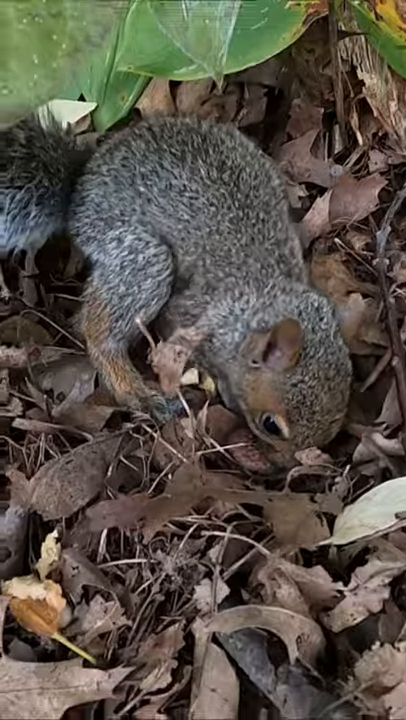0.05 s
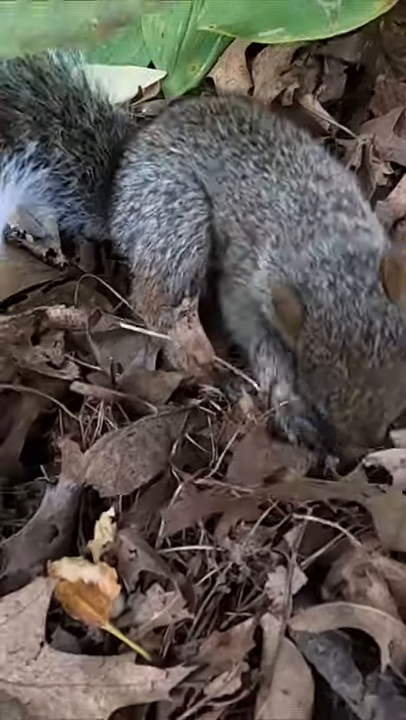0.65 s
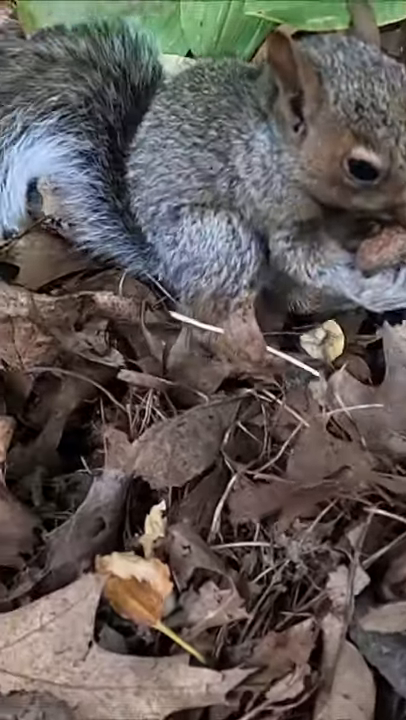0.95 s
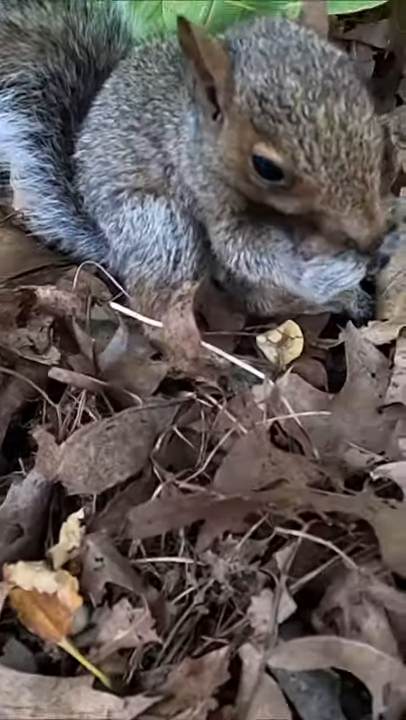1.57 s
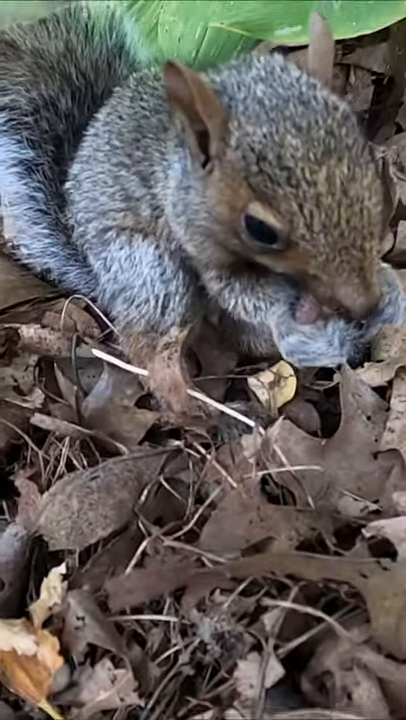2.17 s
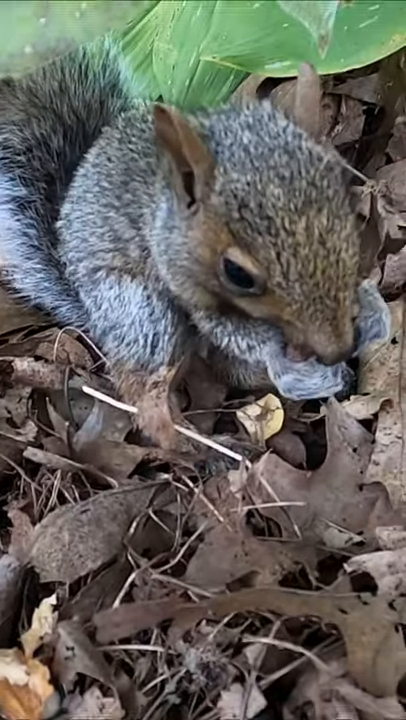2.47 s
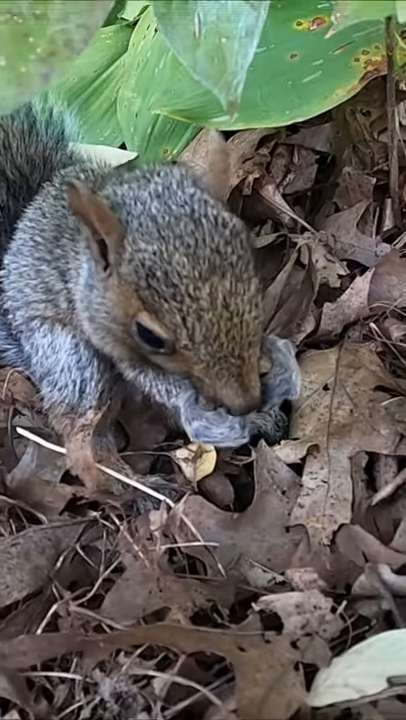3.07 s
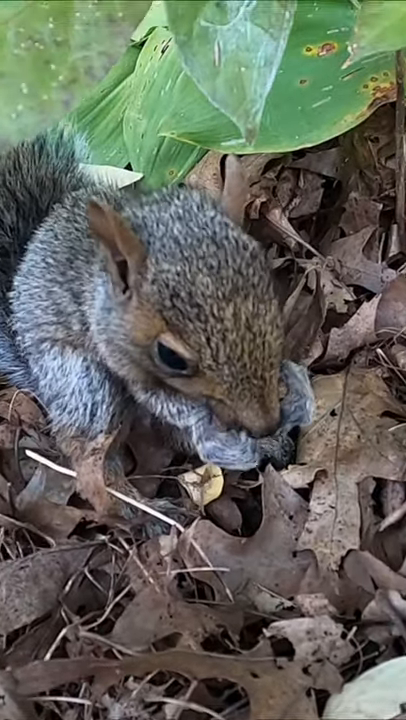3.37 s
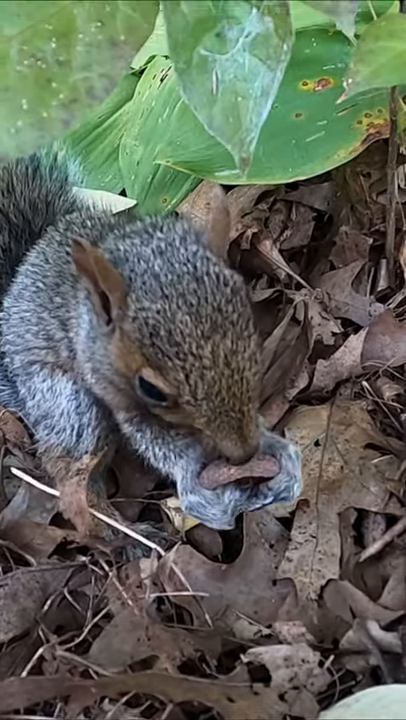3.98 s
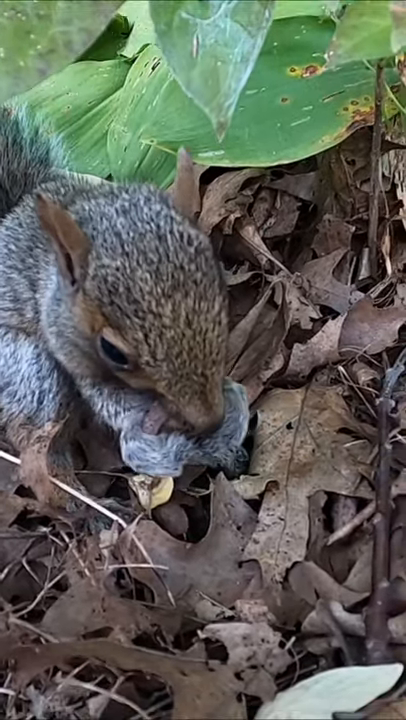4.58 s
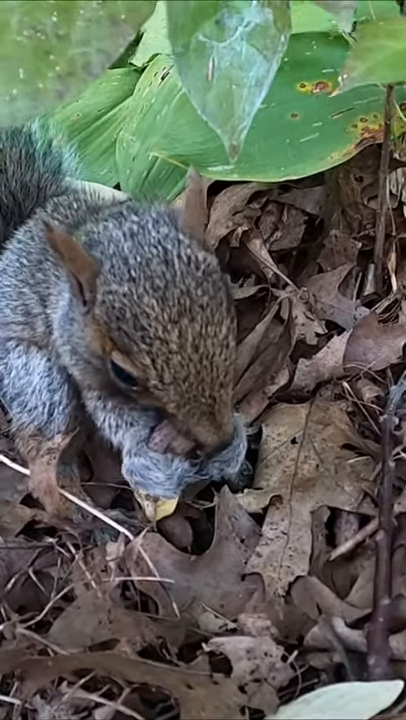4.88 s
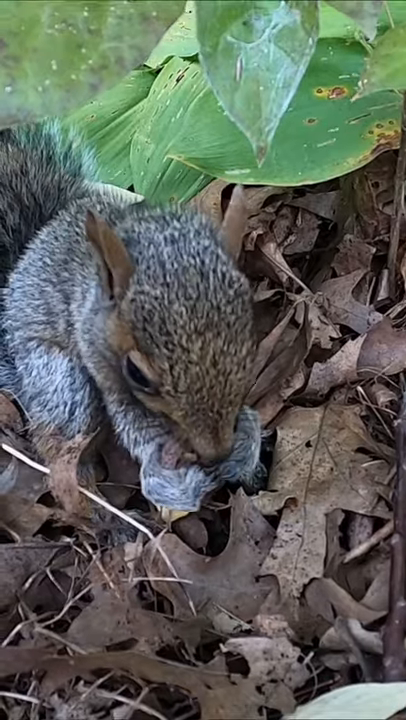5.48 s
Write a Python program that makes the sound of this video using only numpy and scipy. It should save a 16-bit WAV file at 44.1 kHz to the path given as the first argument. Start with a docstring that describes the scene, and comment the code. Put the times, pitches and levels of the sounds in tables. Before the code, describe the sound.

A low wind rumble with a faint hiss runs throughout, outdoors. From the start until about 1.2 seconds, a squirrel close to the microphone shoves through dry leaves in quick, crisp rustles, with small snaps of stalks and a few light twig taps. After a brief lull, a dull handling bump comes at about 1.8 seconds, with softer ones near 2.2 and 2.6. From around 2 seconds the squirrel gnaws a nut: short gritty tooth scrapes and dry, sharp cracks at uneven intervals, over light leaf crackle. A strong crack lands at 2.9 seconds, with more between 3.2 and 3.7. The gnawing pauses around 4 seconds, then clicks again near 4.5. Two very faint, high squeaks occur at about 3 and 4.7 seconds. From 5 seconds to the end at 5.5 comes a busier run of loud shell snaps.

```python
"""Outdoors, on ground covered in dry leaves, a young squirrel noses about close to a hand-held camera,
then sits and gnaws a nut. Leaves crackle under its paws as countless tiny flakes break. Its teeth scrape
the shell and crack it in single sharp snaps. The nut rings, twigs tap, the hand bumps the camera,
and there are two faint squeaks. A low wind rumble with a faint hiss lies under it all."""
import sys
import numpy as np
from scipy import signal
from scipy.fft import rfft, irfft
from scipy.io import wavfile
from scipy.ndimage import uniform_filter1d

SR = 44100
rng = np.random.default_rng(int(sys.argv[2]) if len(sys.argv) > 2 else 0)


def store_wav(level_fs):
    """Save 16-bit WAV to argv[1]."""
    pcm = np.round(np.clip(np.atleast_2d(level_fs), -1, 1) * 32767)
    wavfile.write(sys.argv[1], SR, pcm.T.astype(np.int16))


N = 244314
TIME = np.arange(N) / SR
FREQS = np.fft.rfftfreq(N, 1 / SR)

# how strongly the wind rumbles: (time [s], level [dB])
GUSTS = [(0, -30.5), (0.45, -35), (1.4, -34.5), (1.9, -34), (2.9, -34), (3.6, -35), (4.5, -33.5),
         (5.54, -34.5)]
# tone of the rumble: (frequency [Hz], relative level [dB])
RUMBLE_TONE = [(4, -24), (15, -11), (30, -5), (60, -0.5), (100, 0), (160, -8), (230, -13.5), (320, -20.5),
               (450, -31.5), (650, -44), (1000, -77.5)]
# how alike the rumble is at the two microphones: (frequency [Hz], likeness [0-1])
RUMBLE_LIKENESS = [(25, .975), (90, .989), (220, .973), (500, .88), (1000, .7)]
# swirls of air hitting the microphones: (peak time [s], half-length [s], level [dB])
SWIRLS = [(0.126, 0.067, -55), (2.347, 0.1, -45), (4.556, 0.082, -32), (5.283, 0.45, -41.5)]
# tone of the far hiss: (frequency [Hz], relative level [dB])
HISS_TONE = [(300, 0.5), (600, 2.5), (850, -3), (1200, 2.5), (2000, -4.5), (4000, -7), (6500, -10),
             (8500, -19), (10500, -30), (13000, -47), (15000, -65)]
# how alike the hiss is at the two microphones: (frequency [Hz], likeness [0-1])
HISS_LIKENESS = [(400, .6), (1200, .5), (3000, .25), (6000, .05), (12000, 0)]
# the hiss comes from the left: (frequency [Hz], left minus right [dB])
HISS_SIDE = [(400, 6), (1200, 5.5), (3000, 13), (7000, 3.5), (12000, 11)]
# the hand bumps the camera:
# (time [s], thud level [dB], ring level [dB], ring pitch [Hz], ring fade by 60 dB [s], sharpness [Q])
HAND_BUMPS = [(1.844, -20.5, -28.5, 790, 0.026, 4.6), (2.171, -30.5, -53, 744, 0.077, 5),
              (2.618, -29.5, -35, 718, 0.088, 11)]
# dull rubs on the ground: (time [s], pitch [Hz], level [dB], fade by 60 dB [s])
GROUND_RUBS = [(0.135, 780, -43.5, 0.081), (0.743, 900, -44, 0.17), (0.8904, 474, -29, 0.013),
               (2.255, 730, -47, 0.27)]
# twigs tapping: (time [s], pitch [Hz], level [dB])
TWIG_TAPS = [(1.008, 1490, -45), (1.104, 1550, -54), (1.151, 1330, -45), (1.19, 1360, -40),
             (1.86, 1180, -37), (1.891, 1310, -47.5), (2.613, 1500, -52), (3.623, 1140, -38.5),
             (4.248, 1240, -41)]
# the hollow nut and curled leaves ring when bitten or bent:
# (time [s], pitch [Hz], level [dB], fade by 60 dB [s])
NUT_RINGS = [(0.18, 6050, -43.5, 0.053), (0.345, 4000, -39.5, 0.04), (0.603, 3050, -44.5, 0.13),
             (0.868, 2450, -41, 0.078), (1.613, 3000, -49, 0.12), (1.793, 3080, -34, 0.036),
             (1.841, 1710, -32, 0.033), (1.845, 3170, -41, 0.05), (2.617, 3130, -43.5, 0.04),
             (3.2093, 11300, -44, 0.005), (3.601, 11800, -45, 0.0069), (3.784, 3400, -47.5, 0.13),
             (4.338, 2850, -39.5, 0.041), (4.484, 2390, -43, 0.047), (4.513, 3150, -38, 0.013),
             (4.684, 2060, -40.5, 0.046)]
# the tones in the squeaks: (time [s], fade time [s], pitch [Hz], sharpness [Q], level [dB])
SQUEAK_TONES = [(3.015, 0.11, 3050, 8, -63), (3.035, 0.075, 7400, 30, -72), (3.035, 0.075, 8300, 30, -74),
                (4.728, 0.24, 4620, 45, -69.5), (4.728, 0.09, 5300, 14, -66.5),
                (4.728, 0.14, 7400, 35, -71.5), (4.728, 0.08, 7750, 35, -70), (4.728, 0.12, 9830, 35, -80)]
# hiss opening the second squeak: (time [s], fade time [s], level [dB], pitch [Hz], sharpness [Q])
SQUEAK_PUFF = (4.725, 0.045, -66, 10200, 1.8)
# tone of dry leaves: (frequency [Hz], relative level [dB])
LEAF_TONE = [(400, 5.5), (800, -3), (1200, 0.5), (2600, 0), (4000, -3), (5000, -3), (7500, -1.5),
             (10000, -11), (12500, -14), (16000, -30)]
# how much the squirrel stirs between shoves: (time [s], level [dB])
FIDGETING = [(0, -64), (1.25, -60), (1.45, -72.5), (1.8, -64), (2.8, -65), (3.15, -72.5), (3.55, -63.5),
             (3.95, -69.5), (4.4, -67), (5.54, -67)]
# nose and paws push into the leaves: (start [s], length [s], level [dB], fizz relative to level [dB])
SHOVES = [(0.106, 0.1, -58.5, -6), (0.215, 0.061, -58.5, -7), (0.286, 0.098, -52, -7),
          (0.404, 0.15, -57.5, -8), (0.582, 0.054, -55.5, -8.5), (0.646, 0.13, -55.5, -9),
          (0.749, 0.054, -64, 0), (0.834, 0.095, -49.5, -7), (0.935, 0.12, -62, -4),
          (1.123, 0.16, -67, -39), (1.689, 0.2, -56.5, -10.5), (1.902, 0.16, -60, -11.5),
          (2.24, 0.17, -62, -22), (2.561, 0.066, -63, -42), (2.855, 0.078, -56, -5.5),
          (2.918, 0.036, -51, -9), (2.996, 0.086, -65.5, -3), (3.776, 0.069, -61.5, -10),
          (5.184, 0.1, -68, -2.5), (5.37, 0.14, -64, -5)]
# teeth and claws scrape: (middle [s], half-length [s], level [dB], fizz relative to level [dB])
SCRAPES = [(1.08, 0.017, -51, -10), (1.106, 0.013, -48, -9), (1.227, 0.0098, -50.5, -7.5),
           (1.955, 0.028, -47.5, -8.5), (2.049, 0.0098, -53, -10.5), (2.169, 0.032, -53.5, -13),
           (2.351, 0.037, -51.5, -15), (2.527, 0.035, -52, -19), (2.618, 0.0093, -49.5, -15),
           (2.682, 0.0054, -49.5, -19), (2.713, 0.02, -49.5, -14), (2.802, 0.014, -56, -25),
           (3.424, 0.0052, -43, -15), (3.699, 0.018, -50, -7.5), (4.324, 0.026, -55.5, -9),
           (4.341, 0.014, -54.5, -9.5), (4.481, 0.018, -56.5, -8), (4.515, 0.014, -54, -3),
           (4.693, 0.025, -54, -3.5), (4.977, 0.0043, -50, -10), (5.069, 0.013, -59, 3),
           (5.195, 0.013, -50.5, -3), (5.349, 0.009, -54.5, -9)]
# trodden leaves are crisper than the gnawed nut: (time [s], change in the highest treble [dB])
CRISPNESS = [(0, 3.5), (0.9, 4), (1.2, 4.5), (1.45, 0), (2.6, -3), (3.05, -4), (3.3, -3), (3.75, 2.5),
             (4.3, -22), (5.2, -8), (5.5, -9)]
# shell and leaf stalks snap: (time [s], low ring [dB], main ring [dB], main pitch [Hz],
# main sharpness [Q], bright edge [dB], edge pitch [Hz])
SNAPS = [(0.2358, -40, -28, 3020, 1, -18.5, 7500), (0.2851, -26, -18, 2200, 1.6, -33, 6000),
         (0.3077, -19, -16, 3730, 0.76, -25, 9500), (0.347, -16, -23, 2340, 1.6, -11, 3900),
         (0.3862, -28, -29.0, 3900, 0.7, -8.5, 6340), (0.4344, -40, -30, 3200, 1, -20, 6500),
         (0.449, -30, -20, 2800, 2.2, -30, 6500), (0.469, -17, -11.5, 3470, 1.4, -21, 7600),
         (0.4939, -38, -28, 3200, 1, -26, 7000), (0.528, -22, -20, 2740, 2.6, -20, 7300),
         (0.733, -26, -16.5, 3020, 1, -36, 6500), (0.789, -35, -24, 2750, 1, -25, 7500),
         (0.8629, -37, -3.5, 2350, 1.4, -11, 6500), (0.8770, -18, -12, 2520, 1.3, -23, 5500),
         (0.889, -6, -4.5, 2440, 2.6, -8, 6400), (0.8896, -13, -33.0, 2830, 1.5, -19, 10000),
         (0.912, -23, -13, 2300, 1.2, -30, 9800), (0.9282, -45, -13, 2630, 1.4, -12, 4100),
         (0.9670, -28, -18, 2750, 1.2, -23, 6500), (1.0568, -50, -23, 3360, 1.4, -14, 6800),
         (1.149, -27, -30, 2260, 0.8, -22.5, 8500), (1.1941, -5, -22, 3100, 1.4, -23, 9300),
         (1.8195, -26, -16, 3100, 2.2, -35, 6000), (1.8418, -16, -1, 1680, 1.34, -36, 6000),
         (1.8618, -3, -36, 2950, 1.6, -50, 6300), (2.1643, -29, -10, 2460, 1.9, -28, 6500),
         (2.184, -28, -18, 2600, 1.5, -31, 6500), (2.341, -24, -21, 2500, 1, -20, 6000),
         (2.354, -15, -8, 2360, 2, -18, 6300), (2.525, -6.5, -9.0, 2390, 0.71, -12, 5900),
         (2.5407, -22, -14.5, 2900, 1, -26, 6500), (2.6843, -10, -12, 2580, 1.3, -26, 6700),
         (2.705, -8, -7.0, 2920, 0.67, -18, 6700), (2.77, -39, -14, 2740, 2.3, -24, 4000),
         (2.8609, -10, -23, 2900, 0.65, -32, 6900), (2.9059, 0.5, 10.5, 2520, 1.19, -1, 3980),
         (2.9524, -30, -18, 2970, 1, -21, 5770), (3.2092, -6, -5, 2380, 1.4, -6.5, 6600),
         (3.2196, -11, 2.5, 2940, 0.82, -13, 6940), (3.3349, -20, -22.0, 1700, 0.7, -22, 5900),
         (3.3582, -50, -40.5, 3900, 0.7, -24, 7400), (3.4201, -8, -6.5, 2840, 0.96, -9, 5700),
         (3.44, -52, -25, 3900, 0.57, -33, 10000), (3.593, -50, -16, 2790, 1.4, -34, 8900),
         (3.6011, 3.5, -3.5, 2250, 1.36, -10.5, 5300), (3.6845, -13, -12, 2830, 1.2, -21, 5400),
         (3.6899, -20, -12, 2900, 1, -28, 6200), (3.7001, -4, -3, 2180, 2.5, -12.5, 6440),
         (3.7206, -50, -40, 3000, 1, -23, 9000), (3.8053, -45, -17, 3370, 1.4, -26, 5900),
         (3.838, -36, -16.5, 3560, 1.1, -15.5, 8550), (4.0342, -50, -43, 3040, 1.8, -25, 9700),
         (4.4603, -50, -45.5, 3900, 0.8, -24, 10000), (4.4747, -24, -21, 2740, 0.8, -23, 6100),
         (4.4902, -27, -23, 2600, 1.2, -32, 6500), (4.516, -13, -5, 3060, 3.6, -25, 6500),
         (4.544, -14, -2.5, 3020, 2.1, -19, 7800), (4.5529, -15, -15, 3090, 2.9, -23, 5500),
         (4.6554, -28, -25.5, 3870, 0.48, -37, 10000), (4.9906, -16, -14, 2410, 0.73, -19, 6900),
         (5.0084, -22, 1, 2820, 1.08, -3, 7100), (5.073, -10.5, -10.5, 2770, 1.1, -23, 7600),
         (5.1746, -7, -0.5, 2870, 0.85, -31, 9200), (5.192, 8.5, 7, 2320, 1.53, -10, 6730),
         (5.352, -13, -12, 2320, 1.9, -17, 5900), (5.3927, -10, -4.5, 2600, 1.3, -21, 6600),
         (5.4234, -3, 9.5, 2730, 1.6, -8.5, 6840), (5.461, -30, -20, 3160, 1.3, -33, 7100),
         (5.4687, -32, -0.5, 2610, 1.3, -16, 6700), (5.4997, 5.5, 4, 3060, 1.4, -5.5, 6200),
         (5.512, -50, -31.0, 3050, 1.5, -29, 6600)]
# how the shell and the paws around it colour a snap: (frequency [Hz], gain [dB])
SHELL_TONE = [(100, -32), (300, -14), (560, 1), (750, -3.5), (950, -0.5), (1300, -1.5), (1800, 0),
              (2500, 1.5), (3200, -0.5), (3900, 0.5), (4800, -1.5), (6000, -1), (7400, -1.5), (8800, -5),
              (10300, -10), (11800, -13), (14000, -18), (16000, -26)]
# how far the squirrel's sound trails at the left microphone: (frequency [Hz], base phase lag [radians])
LEFT_LAG = [(0, 0), (500, .08), (1500, .27), (2800, .52), (4200, 1.05), (6000, 1.2), (9000, 1.15),
            (16000, 1.1)]
# the head turns right as the squirrel sits up: (time [s], share of the full turn [0-1])
HEAD_TURN = [(0, 0), (.9, .1), (1.3, 1), (4.5, 1), (5.54, .6)]
# the right microphone hears more treble: (frequency [Hz], left minus right [dB])
MIC_BALANCE = [(100, .9), (500, 1), (2000, .2), (4000, -.7), (8000, -2.3), (12000, -5)]


def amp(db):
    """Turns decibels into a number to multiply by."""
    return 10 ** (np.asarray(db) / 20)


def unit(x):
    """Scales a signal to an average (rms) size of 1."""
    return x / np.sqrt(np.mean(x ** 2) + 1e-20)


def at_pitch(table, hz):
    """Looks up a table by frequency, on a log scale."""
    f, value = np.transpose(table)
    return np.interp(np.log(hz + 1), np.log(f + 1), value)


def over_time(table):
    """Joins a table's points with straight lines through the scene."""
    return np.interp(TIME, *np.transpose(table))


def colour(x, gain):
    """Turns each frequency up or down by its own gain."""
    return irfft(rfft(x) * gain, N)


def add(mix, s, sound):
    """Mixes a sound in at s seconds."""
    part = mix[..., max(round(s * SR), 0):][..., :sound.shape[-1]]
    part += sound[..., :part.shape[-1]]


def hump(f, hz, q):
    """Gains that favour pitches near hz; a higher q is narrower."""
    return 1 / (1 + (q * (f / hz - hz / f)) ** 2)


def above(hz):
    """Gains that keep what lies above hz."""
    return 1 / (1 + (hz / (FREQS + 1)) ** 8)


def placed(x, sides):
    """Leans a stereo sound left or right, pitch by pitch."""
    side_db = at_pitch(sides, FREQS)
    return colour(x, amp([side_db / 2, -side_db / 2]))


def noise_pair(likeness):
    """Left and right white noise, partly alike."""
    a, b = rng.standard_normal((2, N))
    same = np.clip(at_pitch(likeness, FREQS), 0, 1)
    return np.array([a, colour(a, same) + colour(b, np.sqrt(1 - same ** 2))])


def noisy_ring(hz, q, swell):
    """Noise around one pitch, with the shape and energy of the swell."""
    f = np.fft.rfftfreq(len(swell), 1 / SR) + 1
    ring = irfft(rfft(rng.standard_normal(len(swell))) * hump(f, hz, q), len(swell))
    return unit(ring * swell) * np.sqrt(np.mean(swell ** 2))


def wind(swirl_hz=42, hiss_db=-60.5):
    """Gusts rumble, deep swirls of air hit each microphone, and a far hiss stays steady."""
    rumble = unit(colour(noise_pair(RUMBLE_LIKENESS), amp(at_pitch(RUMBLE_TONE, FREQS))))
    swirls = unit(colour(rng.standard_normal((2, N)), hump(FREQS + 1, swirl_hz, q=1)))
    swirl_gain = sum(amp(db) * np.exp(-((TIME - s) / half) ** 2) for s, half, db in SWIRLS)
    hiss = colour(noise_pair(HISS_LIKENESS), amp(at_pitch(HISS_TONE, FREQS)))
    hiss = unit(placed(hiss, HISS_SIDE))
    return rumble * amp(over_time(GUSTS)) + swirls * swirl_gain + hiss * amp(hiss_db)


def thud(db, side_db, hz=163.7, rise_s=0.0028, fade_s=0.17):
    """The whole camera rocks briefly in the hand."""
    t = np.arange(SR // 4) / SR
    swell = (1 - np.exp(-t / rise_s)) * amp(-60 * t / fade_s)
    return amp([[db + side_db / 2], [db - side_db / 2]]) * np.sin(2 * np.pi * hz * t) * swell


def knock(db, hz, fade_s, q, side_db, rise_share=0.073):
    """A short rough ring, on the left if side_db is positive; longer ones start more softly."""
    t = np.arange(SR // 4) / SR
    swell = (1 - np.exp(-t / (rise_share * fade_s))) * amp(-60 * t / fade_s)
    return amp([[db + side_db / 2], [db - side_db / 2]]) * noisy_ring(hz, q, swell)


def knocks():
    """Nut, twigs, ground and camera each ring in their own way, from their own side."""
    out = np.zeros((2, N))
    for s, hz, db, fade_s in NUT_RINGS:
        add(out, s, knock(db, hz, fade_s, q=4.2, side_db=2.5))
    for s, hz, db in TWIG_TAPS:
        add(out, s, knock(db, hz, fade_s=0.034, q=1.8, side_db=16.5))
    for s, hz, db, fade_s in GROUND_RUBS:
        add(out, s, knock(db, hz, fade_s, q=1.76, side_db=-4.5))
    for s, thud_db, ring_db, hz, fade_s, q in HAND_BUMPS:
        add(out, s + 0.0033, thud(thud_db, side_db=-11))  # the camera's weight takes a moment to move
        add(out, s, knock(ring_db, hz, fade_s, q, side_db=-11))
    return out


def squeaks(rise_s=0.007):
    """Two faint clusters of high, fading tones; the second opens with a puff of hiss."""
    t, out = np.arange(SR // 3) / SR, np.zeros(N)
    rise = 1 - np.exp(-t / rise_s)
    for s, fade_s, hz, q, db in SQUEAK_TONES:
        add(out, s, amp(db) * noisy_ring(hz, q, rise * np.exp(-2 * (t / fade_s) ** 2)))
    s, fade_s, db, hz, q = SQUEAK_PUFF
    add(out, s, amp(db) * noisy_ring(hz, q, rise * np.exp(-t / fade_s)))
    return out


def flakes(per_second=10000, tick_s=0.00046, cycles=5.1, skew_s=1.6e-5, kinds=48):
    """Each breaking flake of leaf gives a tick and a few cycles of its own pitch."""
    t, out = np.arange(384) / SR, np.zeros((2, N))
    sizes = amp(3.3 * np.minimum(rng.exponential(1, N), 4.2))  # most are small, a few large
    sizes *= rng.random(N) < per_second / SR
    kind = rng.integers(0, kinds, N)
    for k, hz in enumerate(np.geomspace(1000, 14000, kinds)):
        noise = rng.standard_normal(len(t)) + 0.65 * rng.standard_normal((2, len(t)))
        tick = unit(noise * np.exp(-t / tick_s))
        skewed = t + skew_s * rng.uniform(-0.39, 1) * np.array([[1], [-1]])  # flakes lie at many angles
        ring = unit(np.sin(2 * np.pi * hz * skewed) * np.exp(-t * hz / cycles))
        grain = tick + 0.69 * np.sqrt(hz / 4000) * ring
        for at in np.flatnonzero(sizes * (kind == k)).tolist():
            add(out, at / SR, sizes[at] * grain)
    return out


def crumple(x, patchy_db=2.0):
    """Different leaves take the weight from moment to moment, so the tone shifts in small patches."""
    slices = signal.stft(x, nperseg=256)[2]
    patches = uniform_filter1d(rng.standard_normal(slices.shape[1:]), size=5, axis=0)
    patches = unit(uniform_filter1d(patches, size=5, axis=1))
    return signal.istft(slices * amp(patchy_db * patches), nperseg=256)[1][:, :N]


def slips(catch_db, samples):
    """Teeth and leaves catch and slip every few milliseconds: a jittery gain that sounds gritty."""
    jitter = unit(uniform_filter1d(rng.standard_normal(N), samples))
    return unit(amp(catch_db * jitter))


def band_gains(db, fizz_db):
    """Low body, middle crackle and high fizz of a push; a heavier one has less fizz and more body."""
    body_db = 0.31 * (-5 - fizz_db)
    return amp([[db + body_db], [db], [db + fizz_db]])


def rustle_and_scrape(rise_s=0.019, settle_s=0.02):
    """The crackle swells as paws shove the leaves and as teeth and claws scrape."""
    t = np.arange(SR // 2) / SR
    leaf_power = (band_gains(0, fizz_db=-12.5) * amp(over_time(FIDGETING))) ** 2
    for start, length, db, fizz_db in SHOVES:
        swell = np.minimum(t / rise_s, 1) * np.exp(-np.maximum(t - length, 0) / settle_s)
        add(leaf_power, start, (band_gains(db, fizz_db) * swell) ** 2)
    scrape_power = np.zeros((3, N))
    extra_body = amp([[2], [0], [0]])
    for middle, half, db, fizz_db in SCRAPES:
        swell = signal.windows.hann(max(round(2 * half * SR), 8))
        add(scrape_power, middle - half, (band_gains(db, fizz_db) * extra_body * swell) ** 2)
    leaf_power *= slips(catch_db=1.7, samples=40) ** 2
    scrape_power *= slips(catch_db=2.0, samples=50) ** 2
    levels = np.sqrt(leaf_power + scrape_power) * amp([[-1], [-1], [0]])
    bands = (1 - above(2000), above(2000) - above(5000), above(5000))  # body, crackle, fizz
    grains = colour(crumple(flakes()), amp(at_pitch(LEAF_TONE, FREQS)))
    out = sum(unit(colour(grains, band)) * level for band, level in zip(bands, levels))
    return out + colour(out, above(9400)) * (amp(over_time(CRISPNESS)) - 1)


def leaf_echoes(x, near_db=-19, near_s=0.0023, far_db=-28, far_s=0.026):
    """Nearby leaves throw back a quick spray of echoes; plants all around add a faint, wide tail."""
    t = np.arange(SR // 8) / SR
    near = rng.standard_normal(len(t)) * np.exp(-t / near_s) * (t > 0.0007)
    far = rng.standard_normal((2, len(t))) * np.exp(-t / far_s) * (t > 0.001)
    echoes = amp(near_db) * near / np.linalg.norm(near) + amp(far_db) * far / np.linalg.norm(far[0])
    return x + signal.oaconvolve(x[None], echoes, axes=1)[:, :N]


def ragged(f, depth_db=3.5, full_hz=8000):
    """Every broken piece has its own peaks and dips in tone, deeper in the treble."""
    ripple = uniform_filter1d(rng.standard_normal(len(f)), size=17)
    ripple = unit(uniform_filter1d(ripple, size=17))
    return amp(depth_db * np.minimum(f / full_hz, 1) * np.minimum(ripple, 1))


def struck(gain):
    """The ring after one sharp tap on something with this gain at each frequency."""
    log_gain = np.log(np.maximum(gain, 1e-5))
    mirrored = np.r_[log_gain, log_gain[-2:0:-1]]
    spectrum = np.exp(np.conj(signal.hilbert(mirrored)))  # packs the energy at the start
    return np.fft.ifft(spectrum).real[:512]


def snaps():
    """Each break of shell or stalk sets off three very short rings, set by where it breaks."""
    f, out = np.fft.rfftfreq(1024, 1 / SR) + 1, np.zeros(N)
    for s, low_db, main_db, main_hz, main_q, edge_db, edge_hz in SNAPS:
        hollow = amp(low_db) * hump(f, hz=1300, q=1.12) ** 2
        woody = amp(main_db) * hump(f, main_hz, main_q) ** 2
        edge = amp(edge_db) * hump(f, edge_hz, q=1.78) ** 2
        tick = amp(-28) * (amp(main_db) + amp(edge_db))  # the break itself, at all pitches
        tone = (hollow + woody + edge + tick) * amp(at_pitch(SHELL_TONE, f)) * ragged(f)
        add(out, s, struck(tone))
    return out


def scene():
    """The squirrel is a little to the right, so its sound reaches the left later, more so sitting up."""
    left, right = leaf_echoes(snaps()) + rustle_and_scrape() + squeaks()
    lag, turn = at_pitch(LEFT_LAG, FREQS), over_time(HEAD_TURN)
    ahead, aside = (colour(left, np.exp(-1j * share * lag)) for share in (0.85, 1.25))
    left = (1 - turn) * ahead + turn * aside
    return np.array([left, right]) + knocks() + wind()


def record(dry, start_s=0.034, top_hz=15950):
    """The microphones open after a moment, lean the treble to the right and lose the very top."""
    opening = np.clip((TIME - start_s) / 0.00006, 0, 1)
    low_pass = signal.firwin(511, top_hz, window=("kaiser", 9), fs=SR)
    return signal.oaconvolve(placed(dry, MIC_BALANCE) * opening, low_pass[None], "same")


dry = scene()
out = record(dry)
store_wav(out)
```